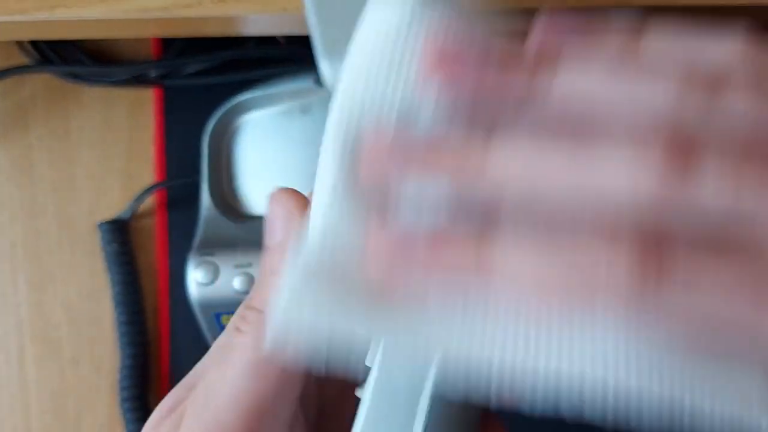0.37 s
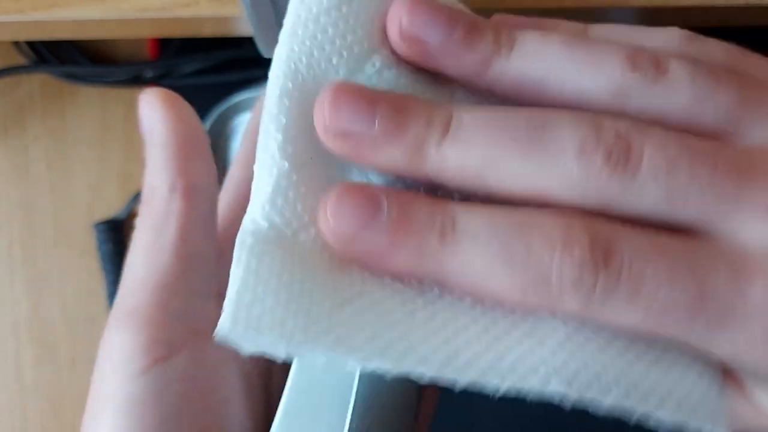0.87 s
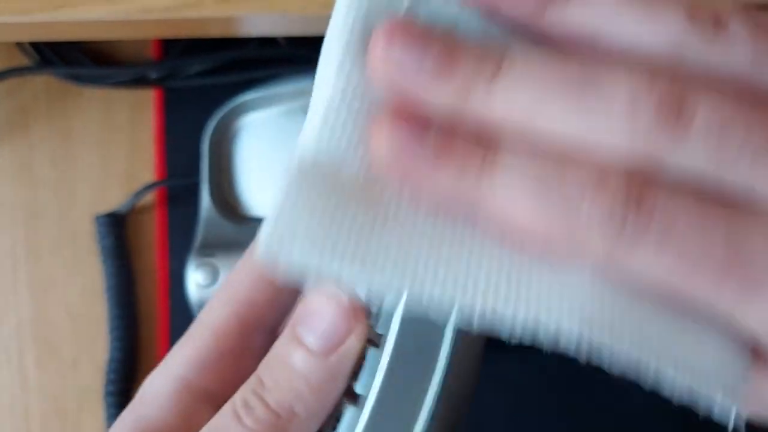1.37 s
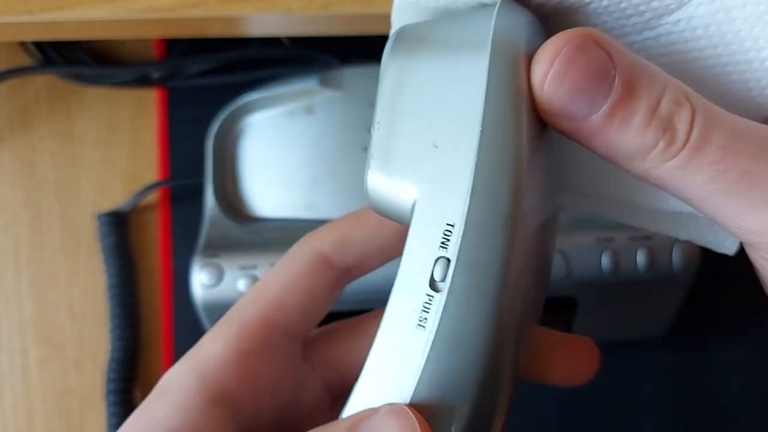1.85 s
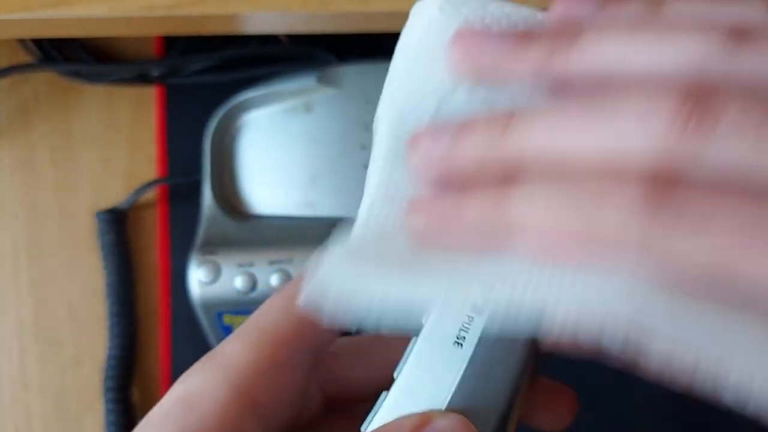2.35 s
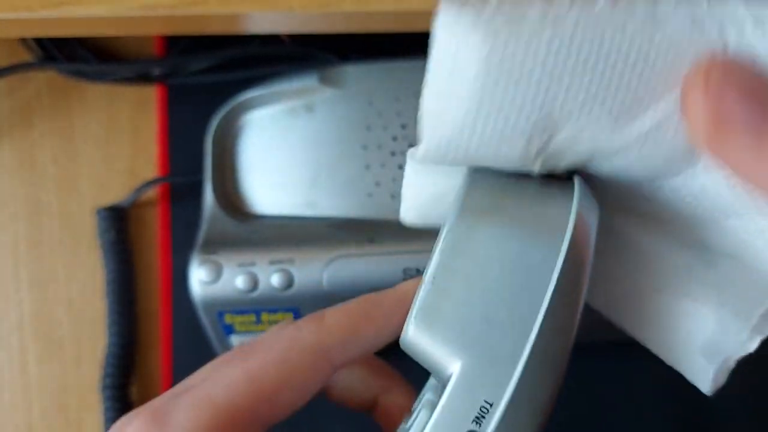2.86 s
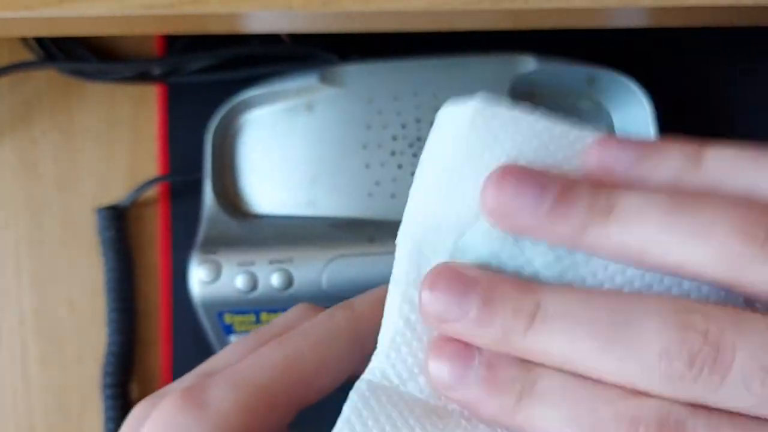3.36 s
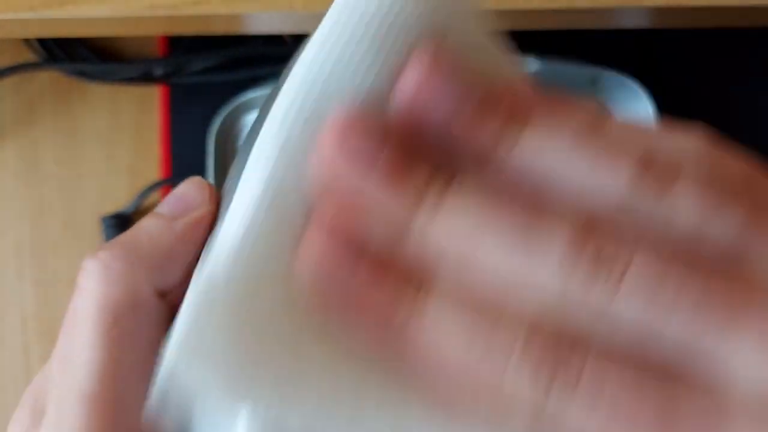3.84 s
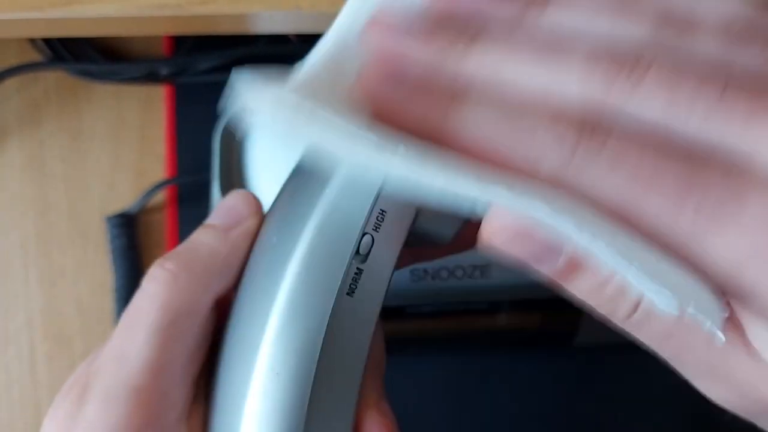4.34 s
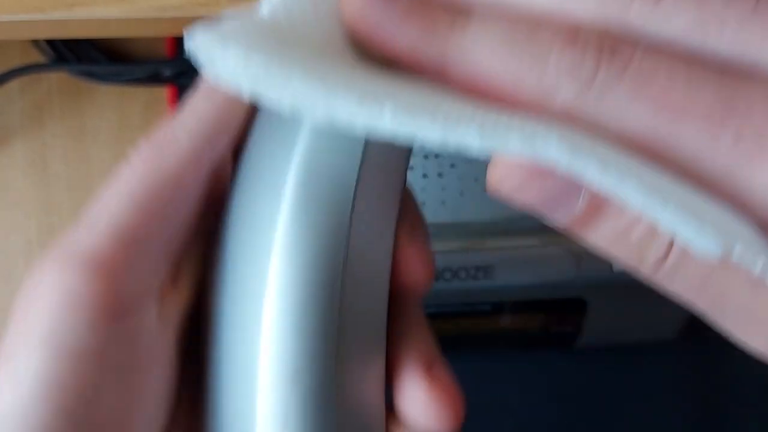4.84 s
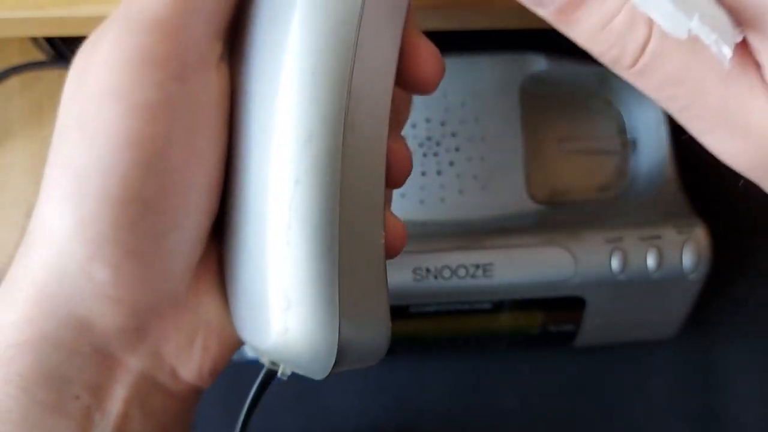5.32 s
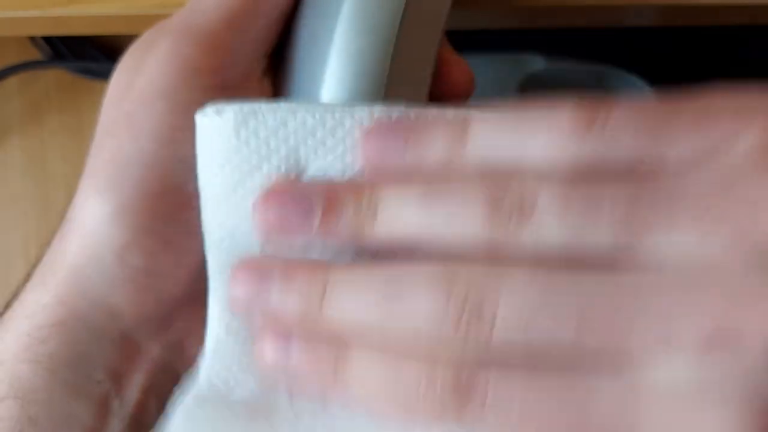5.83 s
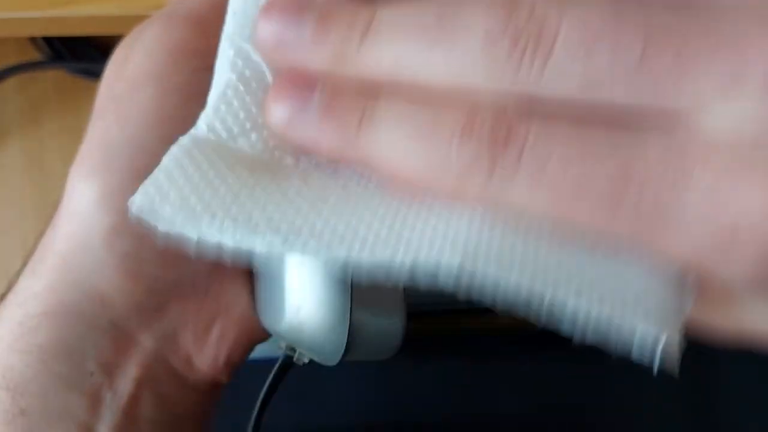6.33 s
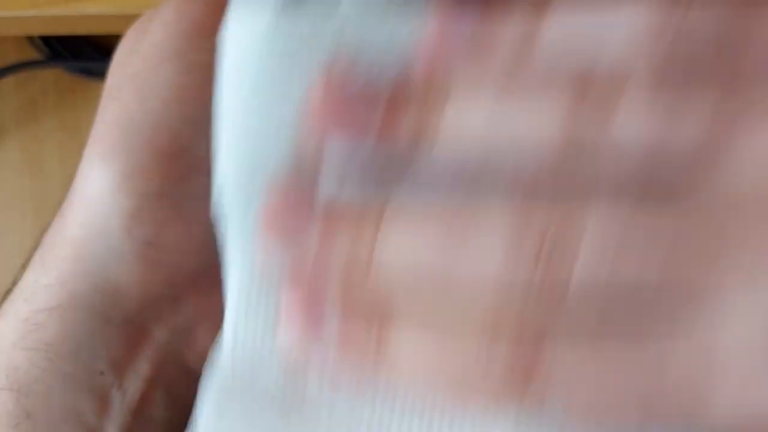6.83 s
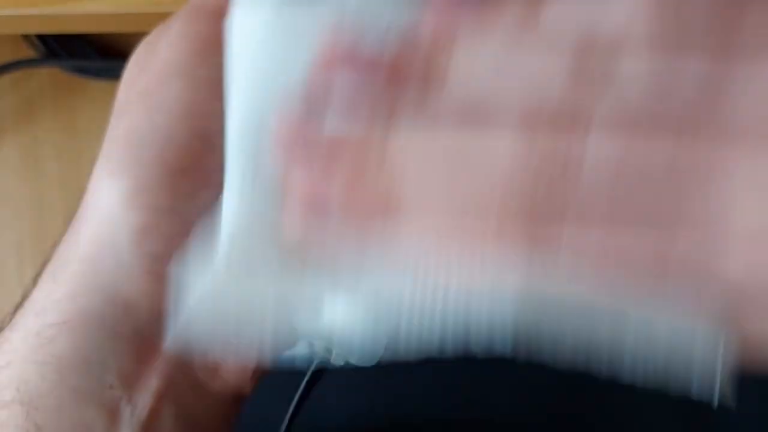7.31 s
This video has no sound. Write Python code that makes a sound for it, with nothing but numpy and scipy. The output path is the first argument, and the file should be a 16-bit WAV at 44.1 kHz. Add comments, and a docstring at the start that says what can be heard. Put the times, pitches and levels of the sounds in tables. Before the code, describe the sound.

Dry, fibrous paper strokes scrape over a plastic casing, heard close up indoors. The rubbing starts very soft, with tiny high squeaks, and grows brisk and airy in the middle. The handset taps, creaks and knocks as it is turned in the hands, arms bump and rumble on a wooden desk, and a heavy hollow knock lands near the end over quiet steady hum.

```python
"""A paper towel rubs a hollow plastic handset, held over a wooden desk in a small room, close to a stereo
microphone. Dense fibre catches hiss, coarser ones excite the casing; drags and squeaks sing in the treble.
Folds snap as noise bursts, and the casing knocks and creaks in the hands as dying modes.
Bumping arms set the desk top booming through its modes, leaning arms rumble; a fan-like hum fills the room."""
import sys
import numpy as np
from scipy import signal
from scipy.fft import rfft, irfft
from scipy.io import wavfile

SR = 44100
rng = np.random.default_rng(int(sys.argv[2]) if len(sys.argv) > 2 else 0)


def natural_amplitude(level_db):
    """Convert a level in decibels to a linear amplitude factor, elementwise."""
    exponent = np.asarray(level_db, float) / 20
    return 10 ** exponent


def put_to_file(sound):
    """Save the sound as 16-bit audio at rate SR, in the file named by the first command-line argument."""
    columns = np.atleast_2d(sound).T  # one column per channel
    safe = np.clip(columns, -1, 1)
    whole_steps = np.round(safe * 32767)
    wavfile.write(sys.argv[1], SR, whole_steps.astype(np.int16))


N = 328104

# knocks and creaks of the handset: (time [s], nominal level [dB], strongest ring [Hz],
# upper modes re level [dB], crack re level [dB])
HANDSET_KNOCKS = [(1.157, -37.5, 690, -9, -52), (1.187, -45, 690, -4, -33), (1.289, -25, 354, -9, -49),
                  (1.438, -48, 690, -8, -17), (2.033, -39, 1520, -26, -18), (2.437, -51, 437, 7, -7),
                  (2.523, -60, 442, 4, -20), (3.415, -51, 387, 3.5, -2), (3.705, -46.5, 444, -8, -13),
                  (3.733, -44, 333, -4.5, -15), (3.785, -35, 455, 1, 0.5), (3.799, -37, 476, -17, -30),
                  (3.854, -40, 456, -10, -22), (3.893, -43, 418, -7, -15), (4.027, -45.5, 2310, -12, -12),
                  (4.117, -41.5, 1660, -1, -13), (4.122, -46, 337, -9, -33), (4.177, -46, 1850, -13, -14),
                  (4.208, -53, 2100, -13, -14), (4.289, -42, 2440, -23, -21),
                  (4.377, -44.5, 2430, -21, -19), (4.399, -46, 2220, -15, -10), (4.808, -55, 475, -11, -10),
                  (5.105, -58, 340, 5.5, 2), (5.49, -38, 435, -14, -40), (5.508, -30.5, 1570, -8.5, -13.5),
                  (5.512, -32.5, 370, -14, -30), (5.557, -31.5, 865, 4, -16.5),
                  (5.841, -40.5, 367, -11, -26), (5.874, -30.5, 366, -4, -27), (6, -46.5, 384, -19, -23),
                  (6.081, -32, 430, -7, -29), (6.342, -56, 965, 4.5, -12), (6.572, -45.5, 1410, -11, -6.5),
                  (6.698, -61, 342, -4, -9), (6.91, -53.5, 460, 5, -14), (7.114, -31, 345, -15, -24),
                  (7.261, -14, 345, -7, -29)]


def rms_one(x):
    """Scale to unit rms."""
    return x / np.sqrt(np.mean(x ** 2) + 1e-20)


def at_hz(points, hz):
    """Read a spectrum on a log-frequency axis."""
    point_hz, value = np.array(points).T
    return np.interp(np.log(np.maximum(hz, 1)), np.log(point_hz), value)


def hump(hz, centre_hz, width_hz):
    """Resonance shape, 1 on top and half that at the edges of its width."""
    return 1 / (1 + (2 * (hz - centre_hz) / width_hz) ** 2)


def humps(resonances):
    """Gain of a few broad resonances in parallel."""
    return lambda hz: sum(natural_amplitude(db) * hump(hz, centre_hz, width_hz) for centre_hz, width_hz, db in resonances)


def drift(rate):
    """Random wander: straight lines between unit-spread knots, rate of them a second."""
    knots = rng.standard_normal(int(N / SR * 100))
    return np.interp(np.arange(N) / SR * np.clip(rate, .1, 90), np.arange(len(knots)), knots)


def coloured(pair, gain_at):
    """Two unrelated sources become left and right, alike mostly in the bass; rms 1."""
    # how alike the two sides are: (frequency [Hz], left-right correlation [-1..1])
    likeness = [(30, 0.8), (100, 0.85), (300, 0.9), (700, 0.13), (1400, 0.17), (3000, 0.018),
                (6000, 0.0089)]
    hz = np.arange(N // 2 + 1) * SR / N
    alike = np.clip(at_hz(likeness, hz), -.99, .99)
    mid, side = rfft(pair) * gain_at(hz) * np.sqrt([1 + alike, 1 - alike])
    return rms_one(irfft([mid + side, mid - side], N))


def grains(per_s, spread_db):
    """Two streams of fibre catches of uneven size, at random times and of either sign."""
    sizes_db = spread_db * np.minimum(rng.exponential(1, (2, N)), 5)
    sizes = natural_amplitude(sizes_db) * rng.choice([-1, 1], (2, N))
    return sizes * (rng.random((2, N)) < per_s / SR)


def swells(rows, column):
    """Rounded swells around their crests, powers added; gives a gain."""
    # one rise before and one fall after its crest, a swell is edge_db down
    edge_db, roundness = -12, 2.0
    t, power = np.arange(0, N, 32) / SR, 1e-14
    for row in rows:
        crest_s, rise_s, fall_s = row[:3]
        away = np.abs(t - crest_s) / np.maximum(np.where(t < crest_s, rise_s, fall_s), .005)
        level_db = row[column] + edge_db * np.minimum(away, 5) ** roundness
        power = power + natural_amplitude(level_db) ** 2
    return np.interp(np.arange(N) / SR, t, np.sqrt(power))


def add(out, s, sound):
    """Mix a short sound into both sides at time s."""
    i = round(s * SR)
    out[:, i:i + len(sound)] += sound[:N - i]


def ringing(modes, gains_db, t, signs):
    """Sum of dying sines, each starting in its own sense."""
    hz, level_db, t60_s = np.transpose(modes)[:, :, None]
    envelopes = natural_amplitude(level_db + gains_db[:, None] - 60 * t / t60_s)
    return np.sum(signs[:, None] * envelopes * np.sin(2 * np.pi * hz * t), axis=0)


def alternate(modes):
    """Neighbouring modes start opposite, so the ring swells in."""
    return (-1) ** np.arange(len(modes))


def struck(rings, force, db):
    """Ringing driven by a contact force, scaled to its peak."""
    sound = signal.fftconvolve(rings, force)
    return natural_amplitude(db) * sound / np.abs(sound).max()


def wiping():
    """Dense fibre catches hiss; coarser ones excite the casing under the paper and in the hands."""
    # strokes of the towel, and the short hiss and rasp after the knock near 5.51 s:
    # (crest [s], rise [s], fall [s], paper hiss [dB], casing rasp [dB])
    hiss_and_rasp_swells = [(.02, .05, 0.26, -75.5, -73), (.28, 0.075, 0.11, -69, -77),
                            (.42, .12, .14, -67.5, -59.5), (.6, 0.12, 0.15, -69, -68.5),
                            (1.22, 0.043, 0.066, -81, -77), (1.31, 0.1, .11, -76, -69),
                            (1.445, .02, 0.096, -72, -75), (1.575, 0.044, 0.075, -71.5, -70.5),
                            (1.685, .03, 0.049, -76, -77), (1.99, 0.037, 0.018, -62.5, -61),
                            (2.04, 0.026, 0.035, -54.5, -52), (2.16, 0.18, 0.17, -68, -66),
                            (2.42, 0.094, 0.092, -61.5, -60), (2.57, 0.12, 0.22, -61.5, -61.5),
                            (2.86, .035, 0.051, -60, -70), (2.94, 0.046, 0.078, -69, -66.5),
                            (3.02, 0.06, 0.13, -56.5, -64), (3.13, 0.19, 0.13, -49.5, -64.5),
                            (3.22, 0.053, 0.049, -52.5, -66), (3.4, 0.14, 0.14, -54.5, -65),
                            (3.72, 0.088, 0.085, -54, -56), (3.79, 0.021, 0.027, -58, -48),
                            (3.92, 0.075, 0.12, -48.5, -57.5), (4.06, 0.08, .04, -53, -61.5),
                            (4.13, 0.077, .12, -63, -56), (4.26, 0.2, 0.068, -60.5, -62.5),
                            (4.41, 0.043, 0.13, -57, -58.5), (4.62, 0.14, 0.16, -64, -62.5),
                            (4.8, 0.066, 0.063, -58, -58.5), (5.09, 0.3, 0.06, -69.5, -68.5),
                            (5.26, 0.031, 0.097, -78, -63.5), (5.39, 0.087, 0.12, -79, -68.5),
                            (5.513, 0.011, 0.026, -58.5, -48.5), (5.565, .02, 0.047, -66.5, -54),
                            (5.75, 0.11, 0.15, -78, -72.5), (5.875, 0.024, 0.044, -61.5, -56.5),
                            (5.96, 0.061, 0.11, -68.5, -57.5), (6.09, 0.025, 0.054, -72.5, -62.5),
                            (6.27, 0.13, 0.11, -72, -78), (6.45, 0.16, 0.15, -70, -68),
                            (6.59, 0.024, 0.11, -65, -60.5), (6.72, 0.082, 0.12, -66, -59),
                            (6.84, 0.034, .05, -59, -61.5), (6.91, .06, 0.037, -54, -55.5),
                            (7.03, 0.11, 0.12, -64, -63.5), (7.13, 0.042, 0.048, -54.5, -60),
                            (7.29, 0.079, 0.098, -42, -52.5), (7.435, 0.016, .03, -49, -56)]
    # colour of the paper hiss: (frequency [Hz], relative level [dB per Hz])
    hiss_spectrum = [(1500, -12.5), (3000, -8.5), (4200, -0.5), (5200, -1), (8800, 0.5), (12500, 0),
                     (15000, -4), (16500, -38.5)]
    # casing under the paper: (centre [Hz], width [Hz], relative gain [dB])
    casing_under_paper = [(1314, 910, 4), (1890, 1300, 4), (3570, 3900, 1)]
    # casing in the hands: (centre [Hz], width [Hz], relative gain [dB])
    casing_in_hands = [(320, 175, 8.5), (464, 95, 6), (763, 500, -3.5)]
    rub_re_rasp_db = -3.5   # the holding hand feels the rasp
    hiss_gain = swells(hiss_and_rasp_swells, column=3)
    rasp_gain = swells(hiss_and_rasp_swells, column=4)
    rub_gain = natural_amplitude(rub_re_rasp_db) * rasp_gain + jostle()
    hiss = coloured(grains(per_s=16000., spread_db=3.0), lambda hz: natural_amplitude(at_hz(hiss_spectrum, hz)))
    rasp = coloured(grains(per_s=2500., spread_db=2.0), humps(casing_under_paper))
    rub = coloured(grains(per_s=600., spread_db=3.0), humps(casing_in_hands))
    pressure_db = 0.8 * drift(15.0) + 1.2 * drift(60.)   # the hand presses unevenly
    rasp_wander = natural_amplitude(1.3 * drift(30.))
    return natural_amplitude(pressure_db) * (hiss_gain * hiss + rasp_wander * rasp_gain * rasp + rub_gain * rub)


def jostle():
    """A dull knock shifts the casing in the hands: gain of a rub that dies away after it."""
    re_knock_db, t60_s, dull_under_hz = -20.5, .4, 1000
    kicks = np.zeros(N)
    for s, db, centre_hz, *_ in HANDSET_KNOCKS:
        kicks[round(s * SR)] = natural_amplitude(db + re_knock_db) * (centre_hz < dull_under_hz)
    return signal.lfilter([1], [1, -natural_amplitude(-60 / (t60_s * SR))], kicks + 1e-18)


def drags():
    """The towel drags on a seam: coarse catches ring one narrow band for the length of a drag."""
    # drags: (crest [s], rise [s], fall [s], level [dB], pitch [Hz])
    seam_drags = [(.42, .12, .14, -76, 4100), (1.57, .04, 0.053, -71.5, 4850),
                  (3.72, .03, 0.033, -58, 3300), (3.95, 0.12, 0.12, -62.5, 2300),
                  (4.15, 0.067, .1, -55, 2140), (4.41, 0.054, 0.081, -63, 2300),
                  (5.76, .05, .06, -79.5, 3900), (5.96, 0.045, 0.051, -59, 3720),
                  (6.3, 0.15, .1, -79.5, 4000), (6.73, .05, 0.086, -67, 4200)]
    width_share = 0.21   # bandwidth as a share of the pitch
    catches = grains(per_s=1800.0, spread_db=4.5)
    out = 0
    for row in seam_drags:
        pitch_hz = row[4]
        band = coloured(catches, humps([(pitch_hz, width_share * pitch_hz, 0)]))
        out = out + swells([row], column=3) * band
    return out


def squeaks():
    """Embossed ribs sliding over fine texture sing: thin lines arch with the hand's speed and flutter."""
    # squeaks: (start [s], fastest [s], end [s], top pitch [Hz], bend while speeding up [1/s2])
    rib_squeaks = [(.31, .392, .46, 14600, 50), (.345, .392, .455, 12200, 56), (.432, .42, .53, 12800, 33)]
    slowing = .72   # the hand slows more gently than it speeds up
    level_db, fade_s = -70.5, .025
    out, t = 0, np.arange(N) / SR
    for start, fastest, end, top_hz, bend in rib_squeaks:
        bend_now = bend * np.where(t > fastest, slowing, 1)
        hz = top_hz * np.maximum(1 - bend_now * (t - fastest) ** 2, 0)
        sounding = np.clip(np.minimum(t - start, end - t) / fade_s, 0, 1)
        flutter = natural_amplitude(level_db + 2.5 * drift(80.))
        out = out + sounding * flutter * np.sin(2 * np.pi * np.cumsum(hz) / SR)
    return out


def paper():
    """A fold snaps: a short noisy burst around one pitch."""
    # paper snaps: (time [s], level before the decay [dB rms], pitch [Hz])
    snaps = [(0.0162, -61.5, 5560), (0.0534, -62.5, 8900), (0.108, -59.5, 9900), (0.1366, -64, 12700),
             (0.195, -64, 8210), (0.2844, -71, 12800), (1.9574, -72, 6620), (2.2283, -62.5, 4030),
             (2.8315, -64.5, 4310), (5.955, -53.5, 5600), (6.464, -59, 4350)]
    out = np.zeros((2, N))
    t = np.arange(SR // 30) / SR
    for (s, db, hz), noise in zip(snaps, rng.standard_normal((len(snaps), len(t)))):
        band = signal.butter(1, [hz * 0.86, min(hz * 1.08, 18000)], "band", fs=SR, output="sos")
        burst = rms_one(signal.sosfilt(band, noise))
        add(out, s, natural_amplitude(db) * burst * natural_amplitude(-60 * t / 0.038))
    return out


def handset():
    """Where a knock lands decides which modes ring most; a hard edge wakes the upper modes and cracks."""
    # handset casing modes: (frequency [Hz], relative level [dB], t60 [s])
    casing = [(285, 0, .11), (330, -2, .1), (365, 0, .09), (440, 0, .1), (480, 0, .09), (540, -3, .08),
              (598, -2, .08), (690, -1, .08), (760, -3, .07), (840, -1, .06), (910, -1, .06),
              (990, -3, .05), (1070, -3, .05), (1190, -3, .05), (1320, -2, .05), (1430, -3, .045),
              (1523, 0, .05), (1660, -2, .04), (1810, -3, .04), (1950, -2, .04), (2116, 0, .04),
              (2300, -1, .04), (2440, -2, .035), (2850, -4, .025), (3117, -4, .025), (3400, -4, .025),
              (3900, -5, .02), (4700, -5, .015)]
    crack_cut_hz = 8300
    # edge contact at a crack of -20 dB; a duller crack means a longer contact
    edge_contact_ms, softer_per_db = 0.093, 0.75
    out, hz = np.zeros((2, N)), np.array(casing)[:, 0]
    t = np.arange(SR // 5) / SR
    chance = rng.standard_normal((len(HANDSET_KNOCKS), len(hz)))
    noise = rng.standard_normal((len(HANDSET_KNOCKS), 2, len(t)))
    crack_filter = signal.butter(1, crack_cut_hz, fs=SR)
    quick = natural_amplitude(-60 * t / .015)
    for knock, spread, (chatter, hiss) in zip(HANDSET_KNOCKS, chance, noise):
        s, db, centre_hz, upper_db, crack_db = knock
        near_db = -6 * (np.log2(hz / centre_hz) / 0.29) ** 2
        push = np.abs(chatter) * natural_amplitude(-60 * t * centre_hz / 0.85)   # dull knocks are slower contacts
        body = ringing(casing, near_db + 1.5 * spread, t, alternate(casing))
        add(out, s, struck(body, push, db - 1))

        edge_db = np.where(hz > 500, 2 * spread, -60)
        contact_ms = edge_contact_ms * natural_amplitude(-softer_per_db * (crack_db + 20))
        soft = np.exp(-1000 / SR / contact_ms)
        tap = (t == 0) + .06 * chatter * quick
        touch = signal.lfilter([1], [1, -2 * soft, soft ** 2], tap)
        upper = ringing(casing, edge_db, t, np.sign(chatter[-len(hz):]))   # random senses
        add(out, s, struck(upper, touch, db + upper_db + 2.0))

        crack = signal.lfilter(*crack_filter, np.gradient(hiss))
        crack = crack * (quick + .15 * natural_amplitude(-60 * t / .09))
        add(out, s, natural_amplitude(db + crack_db + 3.5) * crack)
    return out


def desk():
    """Arms bump the desk top: a soft half-sine push sets its modes ringing."""
    # bumps: (time the push ends [s], peak [dB], lowest modes [dB], upper modes [dB])
    bumps = [(1.168, -22, -10.5, -12.5), (1.297, -23, -11, -4.5), (1.447, -34, -6, 0.5),
             (2.362, -45, -6.5, -12), (2.444, -49.5, -7, -3), (2.523, -59, 7, -1), (2.993, -28.5, -2, -8),
             (3.809, -50, 5, 8), (3.841, -55, 0, -7), (3.891, -38, -5.5, 2), (5.168, -45, -5, 6),
             (5.195, -47.5, -15, 3), (5.245, -48, -5, 11), (5.448, -51, -6, -4), (5.529, -48, 14, -8),
             (5.598, -51, 4, -10), (5.879, -47.5, 2, 15.5), (6.094, -41.5, 3, -16),
             (7.123, -28, -5.5, -1.5), (7.27, -13.5, -4.5, 4.5)]
    # desk top modes: (frequency [Hz], relative level [dB], t60 [s])
    desk_top = [(61.3, -26, 0.16), (90.7, 5, 0.36), (115.56, 0.5, 0.42), (150.2, -8, 0.38),
                (196.6, -10, 0.37), (249.5, -5.5, 0.39), (306, 5.5, 0.095), (345, 10.5, 0.25),
                (447, 7, .12), (559, 2, 0.33), (630, 10, 0.1), (715, 0, 0.15), (870, -10, 0.091),
                (990, -16, .08), (1200, -12, .08), (1340, -14, .08)]
    push_ms = 4.57
    out, hz = np.zeros((2, N)), np.array(desk_top)[:, 0]
    t = np.arange(SR // 2) / SR
    push = np.sin(np.pi * np.clip(t[:500] * 1000 / push_ms, 0, 1))
    for s, db, low_db, upper_db in bumps:
        gains_db = low_db * (hz < 100) + upper_db * (hz > 150)
        rings = ringing(desk_top, gains_db, t, alternate(desk_top))
        add(out, s - push_ms / 1000, struck(rings, push, db))
    return out


def desk_rumble():
    """Arms leaning and shifting on the desk: low noise around 73 Hz swells over a faint resting level."""
    # leans: (crest [s], rise [s], fall [s], rumble [dB])
    leans = [(2.5, .2, 0.22, -63.5), (3.9, 0.14, 0.11, -54), (5.5, 0.3, .3, -60.5), (5.9, .15, .2, -72),
             (6.62, 0.14, .15, -70), (6.85, 0.18, 0.18, -63)]
    resting_db = -86
    rumble = coloured(rng.standard_normal((2, N)), lambda hz: hump(hz, 73, 56))
    return (natural_amplitude(resting_db) + swells(leans, column=3)) * rumble


def room_hum():
    """Fan-like room hum: shaped noise, steady but for a slight wander."""
    # colour of the hum: (frequency [Hz], relative level [dB per Hz])
    hum_spectrum = [(25, -3), (60, -5), (95, -13), (118, -3.5), (160, -5.5), (240, -5.5), (300, 4.5),
                    (340, -6), (400, -16), (490, -8.5), (630, -10.5), (800, -15), (1300, -11),
                    (1600, -17.5), (2000, -22.5), (3200, -38), (5500, -43), (6600, -31), (7500, -39),
                    (12500, -32.5), (16500, -47)]
    level_db = -59
    hum = coloured(rng.standard_normal((2, N)), lambda hz: natural_amplitude(at_hz(hum_spectrum, hz)))
    return natural_amplitude(level_db + 0.12 * drift(8.8)) * hum


def room(x):
    """A tail of dying noise a side, duller than the direct sound."""
    t60_s, wall_cut_hz = 0.23, 5000
    t = np.arange(SR // 2) / SR
    tail = rng.standard_normal((2, len(t))) * natural_amplitude(-60 * t / t60_s) * (t > .004)
    tail = signal.sosfilt(signal.butter(1, [200, wall_cut_hz], "band", fs=SR, output="sos"), tail)
    tail /= np.sqrt(np.sum(tail ** 2, axis=1, keepdims=True))   # unit energy a side
    return signal.fftconvolve(x, tail, axes=1)[:, :N]


def scene():
    """Hits ring in the room; friction and hum are already diffuse."""
    room_db = -11.5
    hits = handset() + paper() + desk()
    friction = wiping() + drags() + squeaks()
    return hits + natural_amplitude(room_db) * room(hits) + friction + desk_rumble() + room_hum()


def top_cut(x):
    """Nothing passes above the cut-off."""
    return signal.sosfilt(signal.butter(12, 16290, fs=SR, output="sos"), x)


def record(dry):
    """The microphone loses the deep bass; its right port is slightly more sensitive."""
    mic_cut_hz, left_re_right_db = 79.4, -0.87
    cut = signal.sosfilt(signal.butter(2, mic_cut_hz, "high", fs=SR, output="sos"), dry)
    sides_db = np.array([[.5], [-.5]]) * left_re_right_db
    return top_cut(cut * natural_amplitude(sides_db))


dry = scene()
out = record(dry)
put_to_file(out)
```